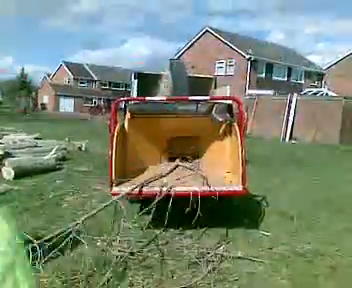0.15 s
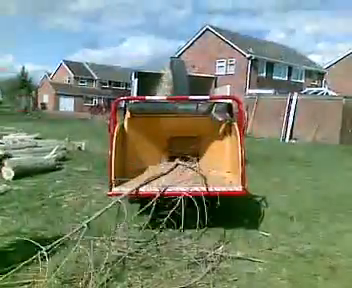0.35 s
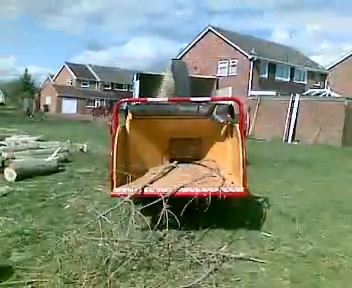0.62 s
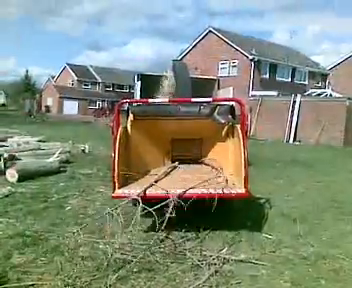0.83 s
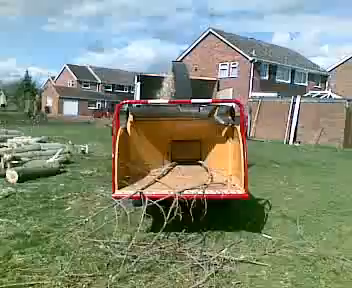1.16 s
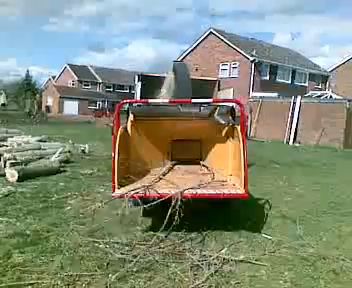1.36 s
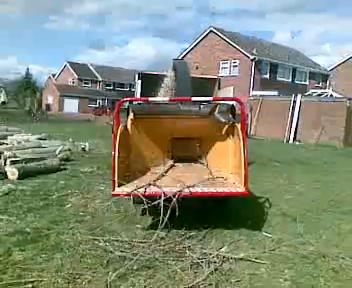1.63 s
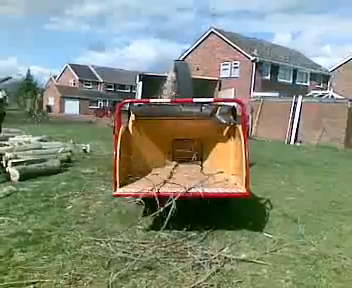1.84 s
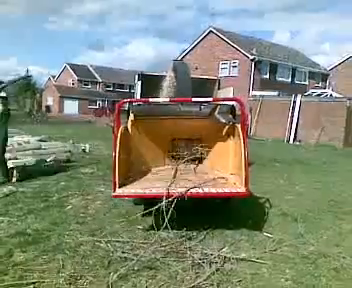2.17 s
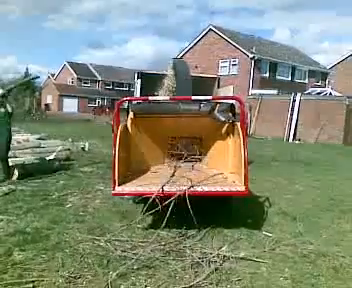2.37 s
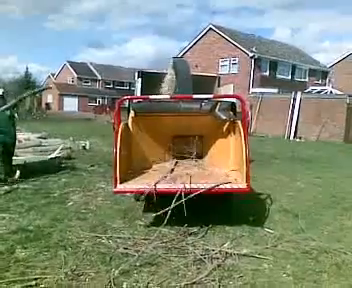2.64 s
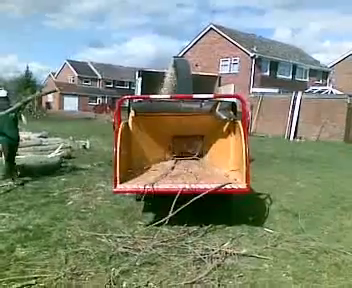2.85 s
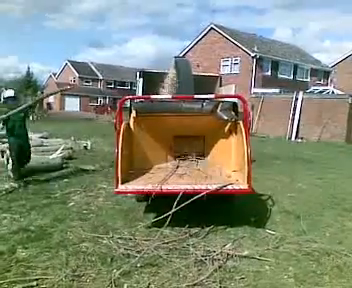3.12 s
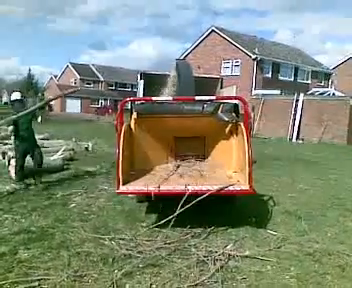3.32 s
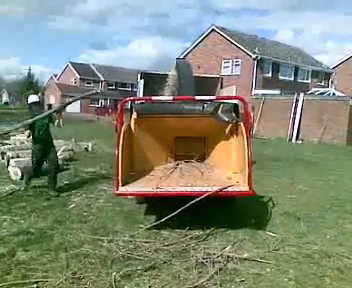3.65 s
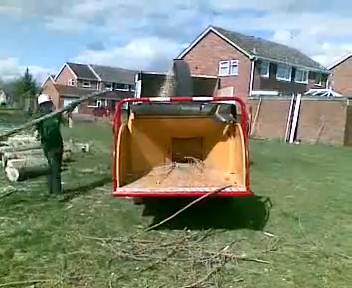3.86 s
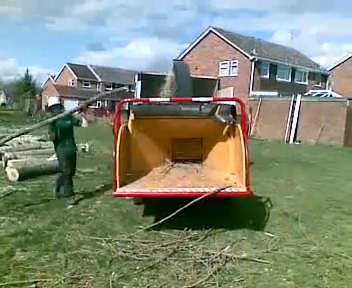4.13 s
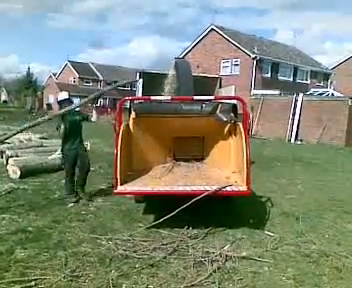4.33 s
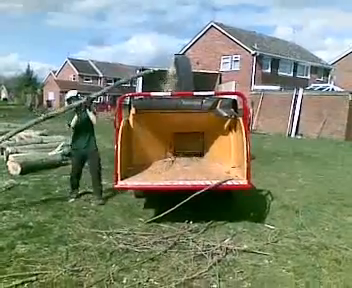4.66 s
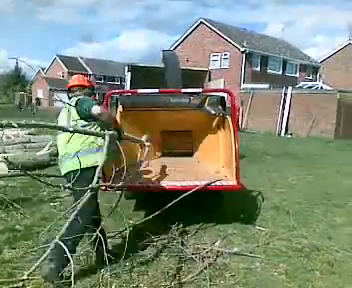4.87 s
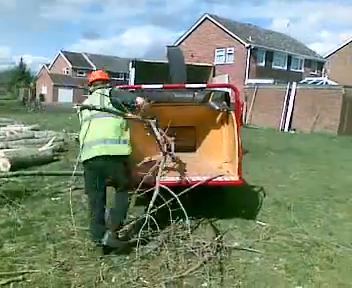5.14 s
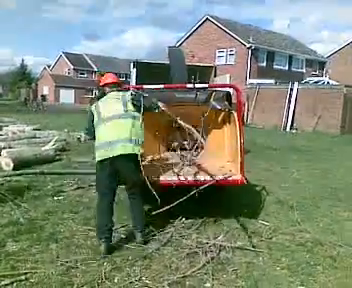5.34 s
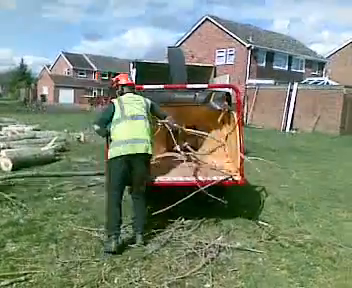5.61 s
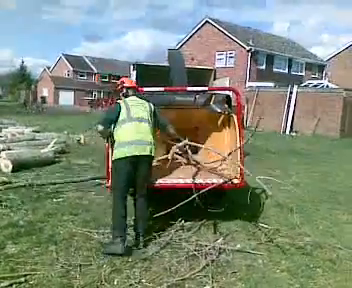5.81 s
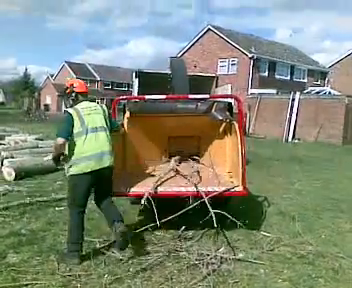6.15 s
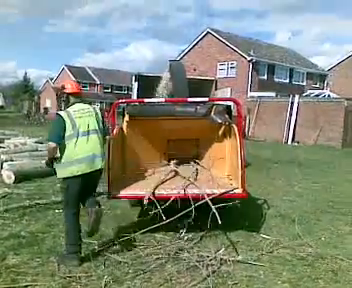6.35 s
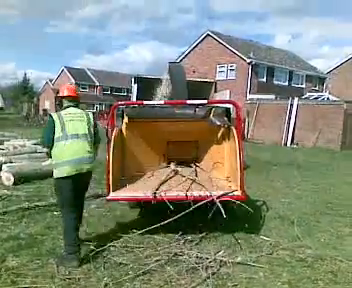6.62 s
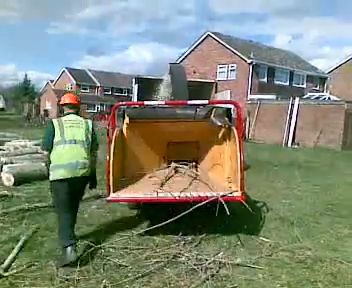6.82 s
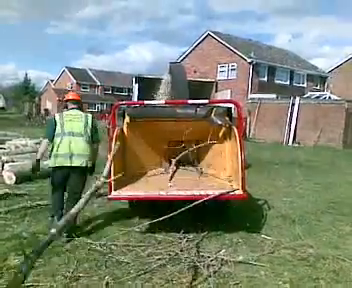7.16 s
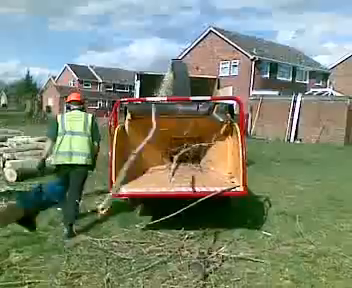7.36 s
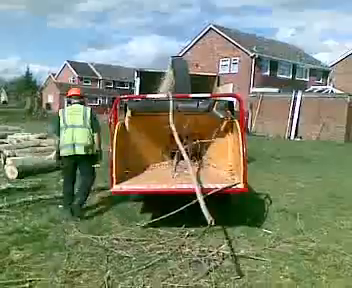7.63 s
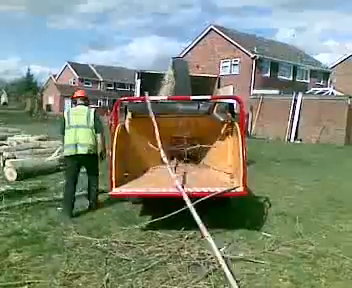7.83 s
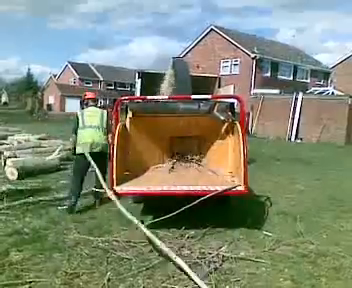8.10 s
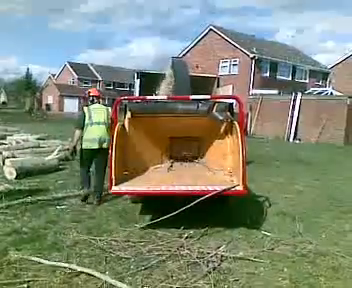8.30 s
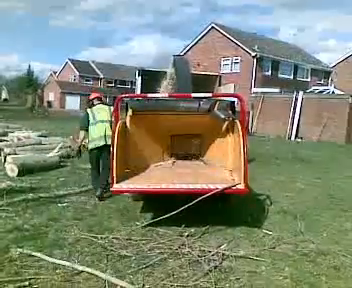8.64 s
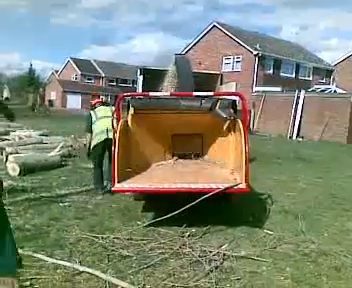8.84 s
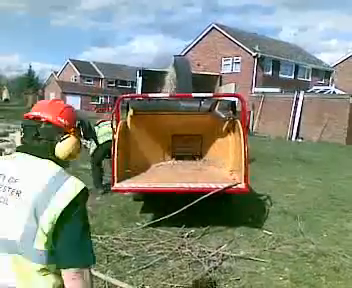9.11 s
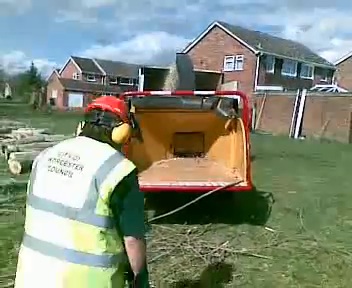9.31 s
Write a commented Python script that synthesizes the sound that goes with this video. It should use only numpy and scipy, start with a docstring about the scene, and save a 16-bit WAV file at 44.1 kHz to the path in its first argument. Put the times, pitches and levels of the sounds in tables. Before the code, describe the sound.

Continuous machine rattle and gritty roar fill an open lawn as a chipper shreds branches, with snapping fibres, brief steel squeaks and a low thump. Midway the cutting stops after heavy knocks; the motor tone lifts and a fast, dry flutter stands out. Then another branch catches, the rotor sags and the crackling roar returns until the end. The small camera hears it close by, slightly dull on top, with wind rumble.

```python
"""A large wood chipper runs on a lawn, a few metres from the microphone, and wind rumbles throughout.
Its rotor turns about 35 times a second over a clatter that repeats every turn. From the start two knives bite
a branch in turn: noise bursts roar and splinter through the steel hopper, with squeaks and a few thumping knocks.
Near 5 s the feed runs empty, the rotor speeds up and its dry slap stands out. Two twigs tick just after 6 s,
then from about 6.6 s the next branch is cut and the rotor slows again."""
import sys
import numpy as np
from scipy import signal
from scipy.fft import rfft, irfft, next_fast_len
from scipy.io import wavfile
from scipy.ndimage import uniform_filter1d

SR = 44100
rng = np.random.default_rng(int(sys.argv[2]) if len(sys.argv) > 2 else 0)


def materialize(psi):
    """Save the field psi as 16-bit PCM at rate SR to the path in sys.argv[1].

    A 1-D psi becomes a single channel; in a 2-D psi each row is a channel.
    """
    bounded = np.clip(np.atleast_2d(psi).T, -1, 1)
    quanta = np.round(bounded * 32767).astype(np.int16)
    wavfile.write(sys.argv[1], SR, quanta)


N = 417627
TIME = np.arange(N) / SR

# Rotor speed, sagging under load. Each row: time in seconds, turns a second in Hz.
SPEED = [(0.0, 34.62), (0.7, 34.49), (1.3, 34.71), (1.7, 34.55), (2.3, 34.86), (3.8, 34.84), (4.1, 34.99),
         (4.97, 35.0), (5.1, 35.69), (6.68, 35.7), (6.9, 35.25), (7.45, 34.58), (8.2, 34.83), (8.75, 34.49),
         (9.47, 34.69)]
# Loudness of the machine's drone. Each row: time in seconds, level in dB.
MACHINE = [(0, -46.5), (1.1, -43), (2, -47), (3, -46.5), (4.4, -47.5), (4.95, -48), (5.15, -50.5),
           (5.7, -49), (6.2, -46), (6.6, -43.5), (6.85, -41), (7.3, -44), (8.2, -44), (9.47, -43)]
# Lines of the drone, before it is scaled as a whole. Each row: multiple of the rotor speed (rounded when used),
# level running empty in dB, level under load in dB.
HUM = [(1, -7.5, -8.5), (2, -1, -11.5), (3, 5.5, 7), (4, -1, 3), (5, -5, -7), (6, 1.5, -2), (7, -17, -6.5),
       (8, -19, -8), (9, -9.5, -17.5), (10, -3, -0.5), (11, -2, -4.5), (12, 1, 1.5), (13, 1, -1.5),
       (14, -1, 1.5), (15, -1, -4), (16, -2.5, -11), (17, 3, 3), (18, -8.5, -3.5), (19, -16, -4),
       (20, -11.5, -4.5), (21, -3.5, -4.5), (22, -1, -5), (23, -4.5, -3), (24, -3.5, 0.5), (25, -12, -10),
       (27, -5.5, -3.5), (28, -21, -9.5), (29, -3, -2), (31, -10.5, -7), (32, -3.5, 2), (33, -16, -3),
       (34, -7, -3), (36, -12.5, -11.5), (37, -6, -3.5), (39, -16, -9.5), (42, -6, -6.5), (46, -8.5, -10.5),
       (52, -7.5, -8.5), (58, -20, -21.5), (67, -20, -23.5), (77.3, -43, -28), (194, -40.5, -33)]
# As the load shifts, a drone line swells or sinks. Each row: time in seconds, length in seconds, pitch in Hz,
# lift in dB.
DRONE_SWELLS = [(1.25, 0.39, 347, 1), (0.85, 1, 590, -3.5), (2.1, 0.4, 418, 2), (3.0, 0.43, 347, -3),
                (4.55, 0.55, 420, 7), (4.3, 0.7, 594, -6), (8.1, 0.55, 213, 5), (6, 0.91, 417, -2.5)]
# The slap stands out once the last chips have cleared. Each row: time in seconds,
# share of the empty drone that slaps (0-1).
CLEARING = [(5.3, 0.7), (6.2, 0.88)]
# Resonances of the hopper and the gaps between them. Each row: centre in Hz, width in Hz, lift in dB.
HOPPER = [(666, 14, -2), (796, 140, 6.5), (1549, 54, 7.5), (1737, 97, 4.5), (2197, 89, -5),
          (2350, 230, 5.5), (2940, 180, -7.5), (3236, 75, 3.5), (3880, 61, -2), (4250, 470, 6.5),
          (4940, 450, -7), (5590, 690, 7.5), (7040, 260, 0)]
# Spectrum of the loose parts. Each row: frequency in Hz, relative level in dB per Hz.
CLATTER_COLOUR = [(100, -23), (200, -3), (300, -16), (400, 2.5), (560, 2.5), (800, -5), (1080, -1.5),
                  (1350, -7), (1850, -10), (2100, -17), (2550, -12), (2800, -20.5), (4200, -29),
                  (7400, -45)]
# Spectrum of air rushing through fan and chute. Each row: frequency in Hz, relative level in dB per Hz.
AIR_COLOUR = [(300, -11.5), (1000, -1), (2500, 1), (3200, 3), (4300, -3), (5600, -6.5), (7400, -11.5)]

# How much wood the knives take. Each row: time in seconds, cutting level in dB.
FEED = [(0, -48), (0.45, -43), (1.0, -44.5), (1.6, -40.5), (2.35, -42), (2.75, -43.5), (3.1, -48.5),
        (3.45, -45.5), (4.1, -46.5), (4.95, -46), (6.62, -49), (6.7, -43), (6.85, -40), (7.15, -42),
        (7.55, -44.5), (8.2, -42), (8.6, -41), (9.05, -45), (9.47, -40)]
# Pieces of wood in the knives. Each row: start in seconds, end in seconds, extra splintering in dB,
# pitch it rings at in Hz, width in Hz, lift in dB.
PIECES = [(0, 3.1, 0, 850, 199, 2), (3.104, 4.99, -1, 2230, 376, 5.5), (6.625, 9.5, 0.24, 2500, 150, 5.5)]
# Spells in which one of the two knives bites deep. Each row: start in seconds, end in seconds,
# place in the turn (0-1), depth of the roar (0-1), depth of the splintering (0-1).
BITES = [(-0.3, 2.81, 0.2, 0.88, 0.92), (2.6, 5.3, 0.34, 0.75, 0.6), (1.8, 3.6, 0.67, 0.25, 0.9),
         (6.1, 7.76, 0.73, 0.7, 0.84), (7.5, 9.9, 0.9, 0.7, 0.63), (7.6, 11, 0.2, 0.3, 0.9)]
# Extra hard bites. Each row: time in seconds, strength of the roar in dB, strength of the splintering in dB,
# both before biting() adds its bite_db.
HARD_BITES = [(0.093, 4.8, 6.7), (0.21, 5.5, 4.5), (.497, 2, 3.1), (0.614, 6.3, 6), (1.048, 5, 4),
              (1.105, 8, 8), (1.249, 6.5, 5.5), (1.596, 4, 6), (1.828, 4, 3), (2.691, 3, 3.6),
              (3.527, 4, 4), (4.325, 4, 2.6), (4.611, 6.5, 7), (6.631, 2, 9), (6.676, 4.6, 5),
              (6.874, 4.5, 5), (6.902, 3, 3), (6.991, 1, 4), (7.853, 5.1, 3), (8.143, 6.6, 4.6),
              (8.172, 5, 5), (9.035, 3, 4), (9.151, 6.9, 6.5)]
# The rollers grab and the wood surges in. Each row: time in seconds, length in seconds, gain in dB.
SURGES = [(0.29, 0.064, 6), (0.515, 0.15, 3.5), (0.76, 0.035, 1.5), (1.07, 0.093, 4.5), (1.293, 0.086, 4),
          (1.44, 0.053, 2), (1.643, 0.064, 2.5), (1.87, 0.072, 5), (2.118, 0.033, 6), (2.274, 0.062, 3.5),
          (3.86, 0.15, 2), (6.7, 0.06, 2.5), (6.907, 0.073, 5), (7.913, 0.13, 4.5), (8.167, 0.054, 2),
          (8.276, 0.074, 3.5), (9.206, 0.072, 4.5)]
# A thick piece crunches low. Each row: time in seconds, length in seconds, level in dB, pitch in Hz.
CRUNCHES = [(1.07, 0.08, -45, 402), (6.76, 0.09, -41.5, 450), (6.886, 0.07, -42.5, 560),
            (7.84, 0.1, -43.5, 560)]
# Spectrum of the cutting. Each row: frequency in Hz, relative level in dB per Hz.
CUT_COLOUR = [(150, -22), (320, -12), (500, -6), (800, -4.5), (1150, 2.5), (1400, 0), (1850, 1.5),
              (2150, -6), (2600, -10), (2900, -11), (3500, -10), (5000, -14.5), (6200, -21), (7400, -28.5)]
# Spectrum of a crunch. Each row: frequency in Hz, relative level in dB per Hz.
CRUNCH_COLOUR = [(200, -18), (340, 2), (600, 2.5), (1000, 3.5), (2000, -34)]

# The strongest gusts. Each row: time in seconds, length in seconds, level in dB.
GUSTS = [(0.68, 0.044, -37.5), (1.45, 0.06, -37), (3.62, 0.47, -44), (5.73, 0.02, -33.5),
         (6.34, 0.043, -42), (6.81, 0.052, -37), (9.15, 0.7, -42)]
# Spectrum of the wind. Each row: frequency in Hz, relative level in dB per Hz.
WIND_COLOUR = [(10, -21), (25, 0.5), (42, -1), (90, -6.5), (130, -14), (200, -22), (300, -29), (600, -59)]
# Wood rubbing on steel makes the hopper sing. Each row: time in seconds, length in seconds, level in dB.
SQUEAKS = [(0.554, 0.044, -39.5), (0.762, 0.051, -37), (0.966, 0.064, -41), (1.248, 0.077, -42),
           (3.6, 0.41, -50), (4.225, 0.043, -39), (7.45, 0.14, -41.5), (7.665, 0.056, -44.5)]
# Knocks and thumps. Each row: start in seconds, peak in dB, pitch in Hz, time to fade by 60 dB in seconds,
# rise in seconds, crack relative to the peak in dB, thud relative to the swing in dB.
KNOCKS = [(1.804, -33, 265, 0.04, 0.0011, -34, -11), (1.805, -22, 108, 0.077, 0.0012, -31, -15.5),
          (4.9918, -20.5, 54.7, 0.04, 0.00066, 10, -20), (5.052, -18, 43.4, 0.079, 0.0033, -45.5, -38),
          (5.078, -13.5, 223, 0.019, 0.01, -50, -38), (5.0803, -29, 780, 0.0092, 0.0006, -45, -30),
          (5.087, -20.5, 71, 0.032, 0.00142, -48, -33), (6.049, -28, 89.5, 0.056, 0.0027, -52, -35),
          (7.851, -30.5, 1820, 0.022, 0.002, -30, -11), (7.854, -23, 88, 0.085, 0.0018, -30, -16),
          (8.296, -32, 100, 0.069, 0.001, -35, -25)]
# Spectrum of a knock's dull body. Each row: frequency in Hz, relative level in dB per Hz.
THUD_COLOUR = [(40, -5), (120, -5), (280, -2.5), (500, -17), (1000, -21), (2500, -60.5)]
# Twigs ticking on the hopper. Each row: time in seconds, strength in dB before twigs() adds its tick_db.
TWIGS = [(6.2895, -49), (6.436, -49)]

SLAP_TURN = 0.77  # where in each turn the rotor slaps (turns)
TURN_POINTS = 1260  # points in a stored turn of sound
BITE_FADE_S = 0.61  # time a knife takes to work into or out of the wood
# At a cutting level of FULL_FEED_DB the splintering treble has the level SPLINTER_DB;
# it gains SPLINTER_SLOPE dB for each dB of cutting.
FULL_FEED_DB, SPLINTER_DB, SPLINTER_SLOPE = -41, -46.5, 0.96
SPLIT_HZ = 2700  # roar below, splintering above
WIND_DB = -42  # steady wind on the microphone
TOP_HZ = 7300


def undb(db):
    """Turn decibels into gain."""
    return 10 ** (np.asarray(db) / 20)


def unit(x):
    """Scale to a standard deviation of 1."""
    return x / np.std(x)


def curve(rows, axis=1):
    """Join one column of a table by straight lines in time."""
    rows = np.array(rows)
    return np.interp(TIME, rows[:, 0], rows[:, axis])


def walk(rate):
    """Drift smoothly at random with spread 1, making about this many new steps a second."""
    hold = int(SR / rate)
    steps = np.repeat(rng.standard_normal(N // hold + 1), hold)
    return unit(uniform_filter1d(steps, hold)[:N])


def colour(x, points, resonances=()):
    """Filter to a spectrum with resonances on top, never sounding ahead of the input; scale to 1."""
    size = next_fast_len(N + SR // 4, True) // 2 * 2
    f = np.fft.rfftfreq(size, 1 / SR)
    hz, db = np.transpose(points)
    gain_db = np.interp(np.log(f + 1), np.log(hz), db)
    for centre, width, lift in resonances:
        gain_db += lift / (1 + (2 * (f - centre) / width) ** 2)
    # folding the cepstrum gives the filter its minimum phase
    cepstrum = irfft(np.log(undb(gain_db)))[:size // 2]
    cepstrum[1:] *= 2
    response = np.exp(rfft(cepstrum, size))
    return unit(irfft(rfft(x, size) * response)[:N])


def ring(x, hz, width, lift_db):
    """Raise or lower one resonance."""
    b, a = signal.iirpeak(hz, hz / width, fs=SR)
    return x + (undb(lift_db) - 1) * signal.lfilter(b, a, x)


def blow(age, rise, fall):
    """Shape a blow: quick swell, exponential fall, nothing before it."""
    age = np.maximum(age, 0)
    return (1 - np.exp(-age / rise)) * np.exp(-age / fall)


def bell(at, length):
    """Make a smooth bump of height 1."""
    return np.exp(-2 * np.minimum(np.abs(TIME - at) / length, 10) ** 2)


def swells(rows):
    """Make a bell-shaped swell for each row of time, length and dB."""
    return sum(undb(db) * bell(at, length) for at, length, db in rows)


def during(start, end):
    """Give 1 between two times, else 0, with quick soft edges."""
    inside = 1. * (TIME >= start) * (TIME <= end)
    return uniform_filter1d(inside, SR // 200)


def after(start):
    """Pick the fifth of a second after a moment: its samples and their age in seconds."""
    first = int(start * SR)
    span = slice(first, first + SR // 5)
    return span, TIME[span] - start


def feeding():
    """Give 1 while wood is in the knives, else 0."""
    return sum(during(start, end) for start, end, *_ in PIECES)


def double_slap(angle, rebound=0.06, rebound_db=0.5, fall=0.048):
    """Once a turn the rotor slaps, and again a small part of a turn later; times are in turns."""
    first, second = (blow((angle - SLAP_TURN - lag) % 1, rise=0.0069, fall=fall) for lag in (0, rebound))
    return first + undb(rebound_db) * second


def drone(angle, db, slap):
    """One turn of rattle with given line levels, read round and round; its upper lines bunch into a slap."""
    place = np.arange(TURN_POINTS) / TURN_POINTS
    accent = 1 + slap * double_slap(place)
    smooth = rfft(rng.standard_normal(TURN_POINTS))
    slapped = rfft(accent * rng.standard_normal(TURN_POINTS))
    multiple = np.arange(len(smooth))
    # the noises give only the timing (phase) of the lines; the table gives their levels
    phase = np.angle(np.where(multiple > 14, slapped, smooth))
    gain = undb(np.interp(multiple, np.round(np.array(HUM)[:, 0]), db, left=-np.inf))
    one_turn = irfft(gain * np.exp(1j * phase))
    return unit(np.interp(angle, place, one_turn))


def wavering(angle, db, rate):
    """Rattles take over from one another: each line wanders on its own while their sum stays level."""
    shares = np.array([walk(rate) for _ in range(5)])
    mixed = sum(share * drone(angle, db, 0) for share in shares)
    return mixed / np.sqrt(np.sum(shares ** 2, axis=0))


def machine(turns, slap=10, play=0.00074, load_play=0.004, loaded_waver=1.17, loaded_drone_db=-1.2,
            loose_db=-8.5, empty_loose_db=0.4, hiss_db=-21, shake=0.75):
    """Engine and rotor: a drone whose lines waver as load shifts; loose parts and rushing air add noise."""
    _, empty_db, loaded_db = np.transpose(HUM)
    load = uniform_filter1d(feeding(), SR // 5)
    angle = (turns + play * walk(30) + load_play * load * walk(8)) % 1

    # further rattles come and go, so every line swells and fades in its own way
    clear = np.clip(curve(CLEARING), 0, 1)
    empty = clear * drone(angle, empty_db, slap)
    empty = empty + np.sqrt(1 - clear ** 2) * wavering(angle, empty_db, rate=7)
    loaded = drone(angle, loaded_db, 0) + loaded_waver * wavering(angle, loaded_db, rate=8)
    lines = unit(empty) * np.cos(load * np.pi / 2)
    lines = lines + undb(loaded_drone_db) * unit(loaded) * np.sin(load * np.pi / 2)
    for at, length, hz, lift_db in DRONE_SWELLS:
        lines = lines + (ring(lines, hz, 25, lift_db) - lines) * bell(at, length)

    # running empty, each slap also shakes the loose parts
    slap_shake = blow((angle - SLAP_TURN) % 1, rise=0.01, fall=0.079)
    shaken = undb(empty_loose_db * (1 - load)) + shake * (1 - load) * slap_shake
    loose = colour(rng.standard_normal(N), CLATTER_COLOUR, HOPPER) * shaken * undb(3.3 * load * walk(70))
    air = colour(rng.standard_normal(N), AIR_COLOUR, HOPPER)
    return (lines + undb(loose_db) * loose + undb(hiss_db) * air) * undb(curve(MACHINE))


def knife(turns, offset, depth, scatter_db=1.7, fall=0.17, wander=0.0089):
    """One bite a turn, each of its own strength and a little early or late; fall and wander in turns."""
    angle = turns - offset + 1
    size, late = rng.standard_normal((400, 2)).T
    angle = angle - wander * np.interp(angle, np.arange(len(late)), late)
    strength = undb(scatter_db * size)[angle.astype(int)]
    return depth * strength * blow(angle % 1, rise=0.02, fall=fall)


def biting(turns, tumble=0.31, bite_db=5.5):
    """Forces behind roar and splintering: knife blows over tumbling chips, and the hard bites."""
    blows = 0
    for start, end, offset, *depths in BITES:
        engaged = np.clip(0.5 + np.minimum(TIME - start, end - TIME) / BITE_FADE_S, 0, 1)
        blows = blows + np.array([knife(turns, offset, depth * engaged) for depth in depths])
    force = np.hypot(tumble, blows)
    # even out the slow loudness, which the feed sets later
    force /= np.sqrt(uniform_filter1d(force ** 2, SR // 10))
    for start, *dbs in HARD_BITES:
        span, age = after(start)
        strike = blow(age, rise=0.0003, fall=0.006)
        hard = np.outer(undb(dbs) * undb(bite_db), strike)
        force[:, span] = np.maximum(force[:, span], hard)
    return force


def alike(turns):
    """Noise that comes round again with every turn of the rotor."""
    place = np.arange(TURN_POINTS) / TURN_POINTS
    return unit(np.interp(turns % 1, place, rng.standard_normal(TURN_POINTS)))


def crunches(chop, width_hz=260, lift_db=3):
    """A thick piece booms at its own pitch while the knives chop it."""
    wood = colour(chop * rng.standard_normal(N), CRUNCH_COLOUR)
    return sum(undb(db) * unit(ring(wood, hz, width_hz, lift_db)) * bell(at, length)
               for at, length, db, hz in CRUNCHES)


def cutting(turns, grain_db=0.8, cut_db=0.08, uneven_db=1.26, repeat=0.58, surge_share=0.17):
    """Each bite is a burst of snapping fibres; between the bites chips tumble through the chute."""
    chop, split = biting(turns)
    grain = np.repeat(undb(grain_db * rng.standard_normal(N // 20 + 1)), 20)[:N]
    snaps = rng.standard_normal(N) * grain
    # one cut through a piece is partly like the next; the likeness drifts as the wood moves in
    drift = walk(3)
    same_cut = alike(turns) * np.cos(drift) + alike(turns) * np.sin(drift)

    # the chop roars in the hopper; the splintering gives the treble
    roar = colour(chop * (snaps + repeat * same_cut), CUT_COLOUR, HOPPER)
    crackle = colour(split * snaps, CUT_COLOUR, HOPPER) * undb(0.76 * walk(45))
    low_pass = signal.butter(5, SPLIT_HZ, fs=SR, output="sos")
    high_pass = signal.butter(5, SPLIT_HZ, "high", fs=SR, output="sos")
    body = unit(signal.sosfilt(low_pass, roar))
    splinters = unit(signal.sosfilt(high_pass, crackle))

    # the feed sets the level of both; a surge mostly swells the roar
    feed_db = curve(FEED) + uneven_db * walk(9.9)
    surge_db = sum(db * bell(at, length) for at, length, db in SURGES)
    body = body * undb(feed_db + surge_db + cut_db) + crunches(chop)
    above_full_db = feed_db + surge_share * surge_db - FULL_FEED_DB
    splinters = splinters * undb(SPLINTER_DB + SPLINTER_SLOPE * above_full_db)
    # each piece splinters and rings in its own way
    return sum(ring(body + undb(splinter_db) * splinters, hz, width, lift_db) * during(start, end)
               for start, end, splinter_db, hz, width, lift_db in PIECES)


def cracks(crack_db=3, spread_db=2, low_hz=900, high_hz=4800, cycles=5, count=400):
    """Single fibres and chips crack at random as short fading tones, louder when the feed is heavy."""
    out = np.zeros(N)
    load = feeding() * undb(curve(FEED) + crack_db)
    for when, pitch, size in rng.random((count, 3)):
        span, age = after(when * TIME[-1])
        hz = low_hz * (high_hz / low_hz) ** pitch
        # a few cracks are much stronger, and higher ones are weaker
        strength = load[span.start] * undb(spread_db * min(-np.log(size), 3)) * np.sqrt(low_hz / hz)
        fade = np.exp(-np.minimum(age * hz / cycles, 20))
        out[span] += strength * np.sin(2 * np.pi * hz * age) * fade
    return out


def wind(eddy_db=1.64):
    """Eddies buffet the microphone as low noise, with a stronger gust now and then."""
    strength = np.hypot(undb(WIND_DB + eddy_db * walk(14)), swells(GUSTS))
    return colour(rng.standard_normal(N), WIND_COLOUR) * strength


def squeaks(pitch_hz=1548, waver=0.0097):
    """A dragged branch briefly rings a strong hopper resonance as a wavering tone."""
    hz = pitch_hz * (1 + waver * walk(150))
    tone = np.sin(2 * np.pi * np.cumsum(hz) / SR) * undb(1.6 * walk(70))
    return tone * swells(SQUEAKS)


def knocks(snap_s=0.0016):
    """Each knock is a pressure snap, a heavily damped swing and a short dull thud."""
    out = np.zeros(N)
    thud = colour(rng.standard_normal(N), THUD_COLOUR)
    for start, db, hz, t60, rise, crack_db, thud_db in KNOCKS:
        span, age = after(start)
        swell = blow(age, rise, 2 * t60 / np.log(1000)) ** 2
        swing = np.sin(2 * np.pi * hz * age) + undb(thud_db) * thud[span]
        swing = swing * swell / swell.max()
        snap = blow(age, rise=0.00001, fall=snap_s)
        out[span] += undb(db) * (swing - undb(crack_db) * snap)
    return out


def slaps(turns, slap_db=-1.5, low_hz=950, high_hz=2020):
    """Running empty, each slap of the rotor has a dry rasp: band-limited noise in the same bursts each turn."""
    band = signal.butter(4, [low_hz, high_hz], "band", fs=SR, output="sos")
    rasp = unit(signal.sosfilt(band, rng.standard_normal(N)))
    level = curve(CLEARING) * (1 - feeding()) * undb(curve(MACHINE) + slap_db)
    return rasp * double_slap(turns) * level


def twigs(tick_db=-3, fall=0.0076):
    """As a branch is drawn in, each twig gives a short bright tick of noise on the steel hopper."""
    ticks = sum(undb(db + tick_db) * blow(TIME - start, rise=0.0002, fall=fall) for start, db in TWIGS)
    return colour(rng.standard_normal(N), AIR_COLOUR, HOPPER) * ticks


def scene():
    """Add all sounds; the rotor angle, counted in turns, drives the clatter, the knives and the slaps."""
    turns = np.cumsum(curve(SPEED)) / SR
    chipper = machine(turns) + cutting(turns) + cracks() + slaps(turns)
    return (chipper + wind() + squeaks() + knocks() + twigs())[None]


def record(dry):
    """A small camera with a narrow audio band: a steep filter removes what lies above TOP_HZ."""
    return signal.sosfilt(signal.ellip(12, 0.2, 70, TOP_HZ, fs=SR, output="sos"), dry)


dry = scene()
out = record(dry)
materialize(out)
```